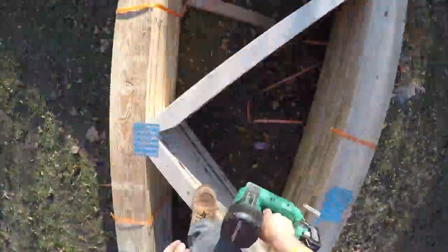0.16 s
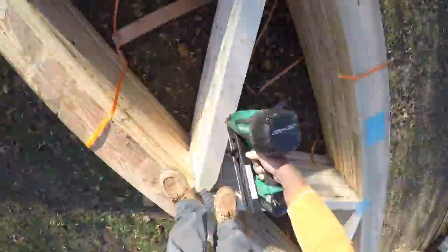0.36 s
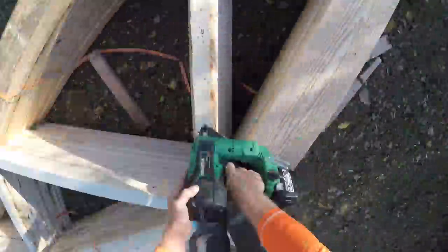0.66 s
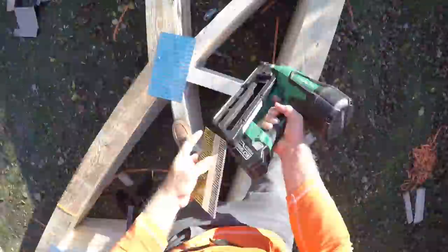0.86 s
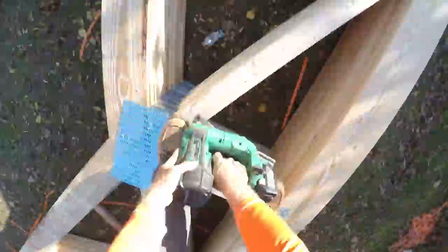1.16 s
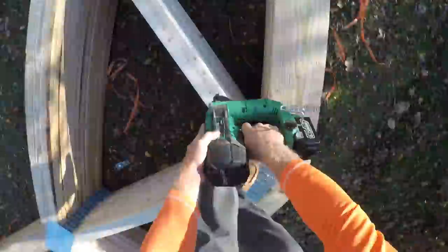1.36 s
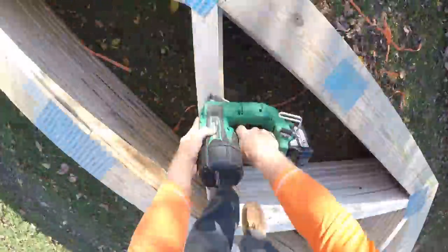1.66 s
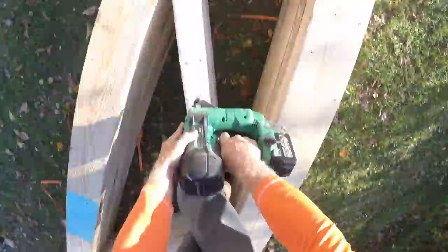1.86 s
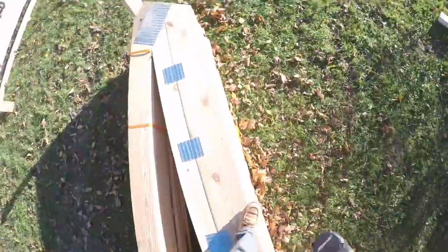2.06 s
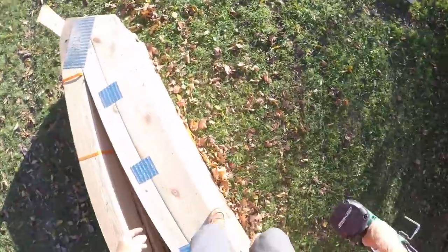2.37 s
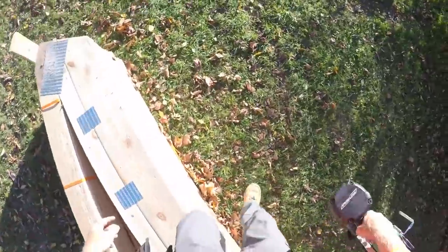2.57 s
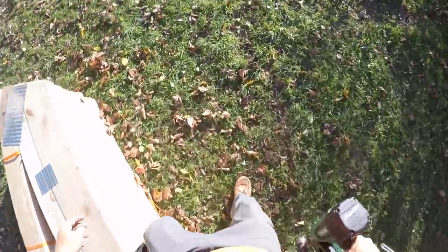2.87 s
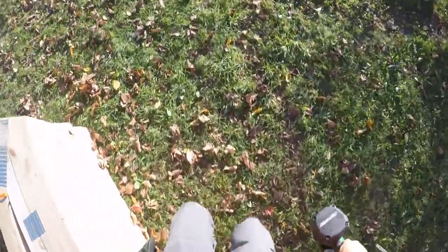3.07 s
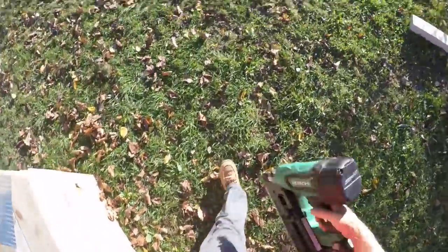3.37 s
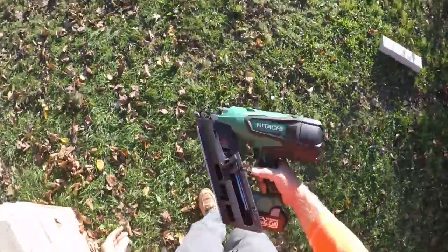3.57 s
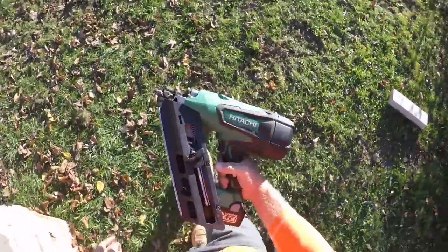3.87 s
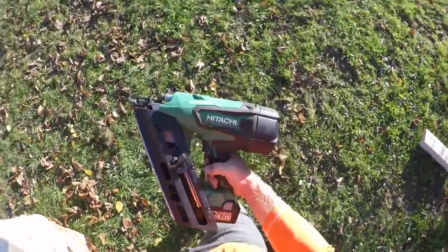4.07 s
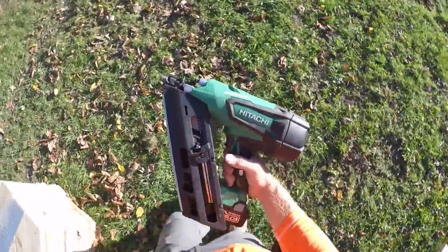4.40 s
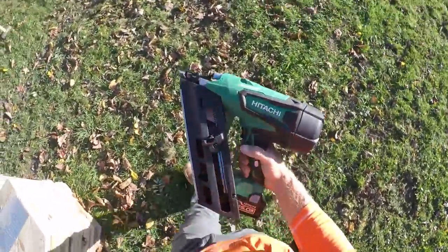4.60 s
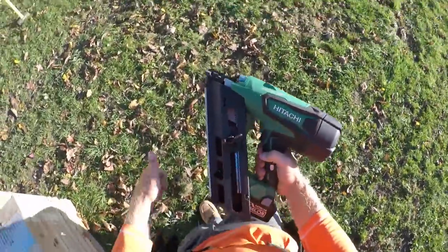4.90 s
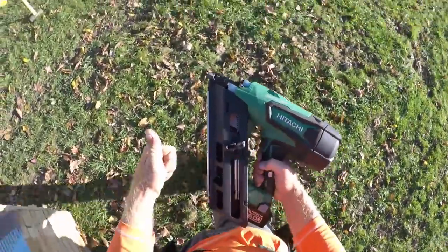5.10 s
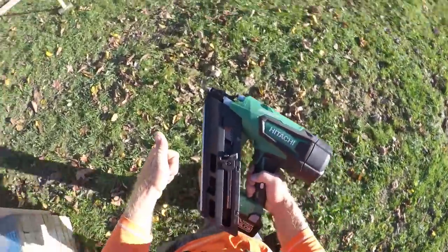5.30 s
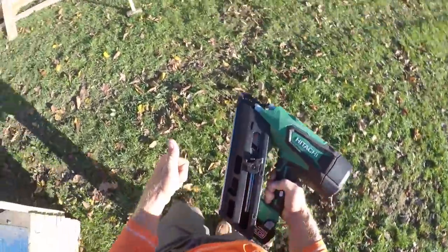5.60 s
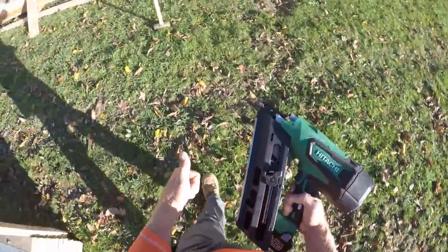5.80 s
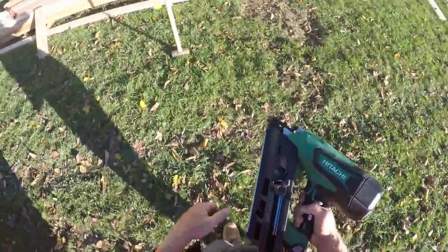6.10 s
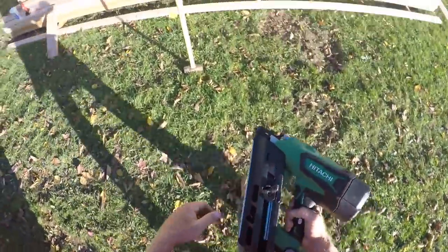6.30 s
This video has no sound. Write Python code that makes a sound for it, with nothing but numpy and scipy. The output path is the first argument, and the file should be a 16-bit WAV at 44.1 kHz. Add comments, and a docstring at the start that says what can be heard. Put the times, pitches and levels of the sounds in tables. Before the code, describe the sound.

Rapid sped-up nail gun snaps and whirrs over a thin whistling rush, then abruptly low wind rumble, leafy footsteps, knocks and a droning distant engine.

```python
"""Nailing roof trusses on a lawn, heard from a body camera. For two seconds the work races by in time-lapse:
outdoor noise is pitched up to a noise rush and an engine whistle made of rough sine lines, and each shot of
the cordless nailer is a noise whirr, a snap and a ring of decaying modes. Then, at normal speed, low noise
rumbles as wind on the microphone, clothes rub close by, a far engine drones as a wavering sine, boots knock
on lumber and tread dry leaves in bursts of noise, and a deep hum comes and goes."""
import sys
import numpy as np
from scipy import signal
from scipy.fft import rfft, irfft, next_fast_len
from scipy.io import wavfile
from scipy.ndimage import uniform_filter1d, map_coordinates

SR = 44100
rng = np.random.default_rng(int(sys.argv[2]) if len(sys.argv) > 2 else 0)


def dump(signal):
    """Clip the signal to [-1, 1] and save it as 16-bit WAV at the path in sys.argv[1]."""
    limited = np.clip(np.atleast_2d(signal).T, -1, 1)
    pcm = np.round(limited * 32767).astype(np.int16)
    wavfile.write(sys.argv[1], SR, pcm)


N = 284445

CUT_S = 2.08  # the time-lapse ends
# nail shots: (time [s], relative wind-up level [dB], ring level [dB], ring centre [Hz])
SHOTS = [(0.0877, -17.5, -36, 2300), (0.1434, -25.5, -31, 2090), (0.174, -28.5, -34, 2410),
         (0.203, -26.5, -41, 2460), (0.2715, -21.5, -33, 2630), (0.3245, -22, -29, 2350),
         (0.358, -23, -31.5, 2310), (0.3939, -24.5, -39, 2630), (0.449, -22.5, -32, 2610),
         (0.5549, -17, -38, 2860), (0.6216, -18.5, -31, 2630), (0.6592, -28.5, -38, 2620),
         (0.6867, -33, -34, 2810), (0.748, -21.5, -31.5, 3160), (1.134, -16, -34.5, 2820),
         (1.159, -32.5, -34, 2880), (1.1932, -33.5, -38.5, 2730), (1.246, -25.5, -33.5, 2290),
         (1.2796, -27.5, -28.5, 2290), (1.3171, -26.5, -32, 2290), (1.3521, -26.5, -32, 2510),
         (1.382, -31, -34, 2830), (1.4209, -30, -34, 2620), (1.469, -26.5, -34.5, 2780),
         (1.5129, -22, -31, 3000), (1.5564, -25.5, -29, 2680), (1.601, -24, -35.5, 2570),
         (1.64, -25, -34.5, 2800), (1.677, -26, -34.5, 2790), (1.7175, -30.5, -33, 2560),
         (1.763, -25, -38.5, 2340), (1.8093, -26.5, -36, 3080), (1.8499, -26.5, -37, 2820),
         (1.89, -25, -40, 2630), (1.9345, -25, -36.5, 2800), (1.9669, -31, -31.5, 3010),
         (2.0019, -28.5, -43.5, 3130), (2.03, -26.5, -35.5, 3010)]
# colour of the pitched-up outdoor noise and of the scrape: (frequency [Hz], density [dB])
RUSH_COLOUR = [(50, -51), (190, -11.5), (480, -8), (780, -3.5), (2010, -6.5), (4500, -17.5), (6500, -26),
               (15000, -32.5)]
# left over right, for the time-lapse and for the yard: (frequency [Hz], level difference [dB])
TOOL_PAN = [(100, -6), (1500, -2.5), (3500, -4), (8000, -11.5)]
YARD_PAN = [(120, -3), (400, -13.5), (700, -8), (1300, -5), (5000, 1.5), (15000, -8)]
# how alike left and right are, before panning: (frequency [Hz], correlation [-1 to 1])
TOOL_ALIKE = [(200, 0.13), (1400, 0.97), (3500, 0.96), (7000, 0.53), (14000, 0)]
YARD_ALIKE = [(40, 0.83), (130, 1), (290, 1), (640, -0.73), (1400, -0.61), (3000, 0.84), (7000, 0.14),
              (15000, 0.39)]


def amp(db):
    """Decibels to gain."""
    return 10 ** (np.asarray(db) / 20)


def unit(x):
    """Scale to rms 1."""
    return x / np.sqrt(np.mean(x ** 2) + 1e-20)


def along(points, hz):
    """(Hz, value) points read on a log axis."""
    f, v = np.transpose(points)
    return np.interp(np.log(hz + 1), np.log(f + 1), v)


def curves(rows):
    """One value per sample for each column after the time."""
    s, *cols = np.transpose(rows)
    return [np.interp(np.arange(N) / SR, s, c) for c in cols]


def during(start, end):
    """1 between two times, with soft edges."""
    t = np.arange(N) / SR
    return uniform_filter1d(((t >= start) & (t < end)) * 1.0, size=128)


def wobble(rate):
    """A smooth random curve, rate knots a second."""
    knots = rng.standard_normal(int(N * rate / SR) + 4)
    at = np.arange(0, len(knots) - 1, 1 / 8)
    return np.interp(np.arange(N) * rate / SR, at, map_coordinates(knots, [at]))


def filtered(x, response):
    """x times a response of frequency."""
    m = next_fast_len(N + 4096, real=True)
    return irfft(rfft(x, m) * response(np.fft.rfftfreq(m, 1 / SR)), m)[..., :N]


def add(track, s, sound):
    """Mix a sound into a track at a time."""
    i = max(round(s * SR), 0)
    track[i:i + len(sound)] += sound[:N - i]


def placed(pair, pan):
    """Lean each frequency to its side."""
    return filtered(pair, lambda hz: amp(np.outer([.5, -.5], along(pan, hz))))


def noise(spectrum, alike, pan, grain_db=0):
    """Stereo noise whose middle has rms 1; grain_db breaks it into crackle."""
    white = rng.standard_normal((2, N)) * amp(grain_db * wobble(900))
    m = next_fast_len(N, real=True)
    hz = np.fft.rfftfreq(m, 1 / SR)
    mid, side = rfft(white, m) * amp(along(spectrum, hz))
    # the less alike the two sides are, the more of the second noise they get
    half_angle = np.arccos(np.clip(along(alike, hz), -1, 1)) / 2
    side = side * np.tan(np.minimum(half_angle, np.pi / 2.5))
    lean = amp(np.outer([.5, -.5], along(pan, hz)))
    pair = irfft(np.array([mid + side, mid - side]) * lean, m)[:, :N]
    return pair / pair.mean(0).std()


def tone(rows, waver, flutter_db=1, orders=((1, 0),), order=1, rough=0, width_hz=100):
    """Unsteady lines; rows follow the line of the given order; rough is the share smeared into narrow noise."""
    hz, db = curves(rows)
    phase = 2 * np.pi * np.cumsum(hz / order * (1 + waver * wobble(30))) / SR
    rough = np.clip(rough, 0, 1)
    lines = 0
    for k, level in orders:
        line = np.sqrt(2 - 2 * rough) * np.sin(k * phase)
        if rough:
            smear = wobble(width_hz) * np.sin(k * phase) + wobble(width_hz) * np.cos(k * phase)
            line = line + np.sqrt(rough) * smear
        lines = lines + line * amp(db + level + flutter_db * wobble(20))
    return lines * during(rows[0][0], rows[-1][0])


def swells(rows, rise, fall, bed_db):
    """Gain of (s, hold s, dB) events over a bed; each rises and falls 20 dB in the given times."""
    t = np.arange(N) / SR
    power = amp(bed_db) ** 2
    for s, hold, db in rows:
        away = np.maximum(s - t, 0) / rise + np.maximum(t - s - hold, 0) / fall
        power = power + amp(db - 20 * np.minimum(away, 10)) ** 2
    return np.sqrt(power)


def blip(s, hz, db, cycles):
    """A soft-edged ring of a few cycles, centred on a time."""
    turns = (np.arange(N) / SR - s) * hz
    return amp(db) * np.exp(-np.minimum((turns / cycles) ** 2, 50)) * np.sin(2 * np.pi * turns)


def resonant(x, hz, q):
    """x through one broad resonance."""
    return signal.lfilter(*signal.iirpeak(hz, q, fs=SR), x)


def racing_yard(rush_db=-4.0, rustle_db=-2, steady_db=-15):
    """In time-lapse wind is a coarse rush with steady tones, steps crackle and the engine whistles roughly."""
    # surges of sped-up outdoor noise: (time [s], hold [s], relative level [dB])
    surges = [(.06, 0.026, -27.5), (.522, 0.03, -24.5), (.83, 0.048, -24.5), (.875, 0.092, -22.5),
              (1.003, .009, -22), (1.06, 0.069, -30.5)]
    # sped-up steps in leaves: (time [s], hold [s], relative level [dB])
    crackles = [(.825, 0.1, -36), (.95, 0.012, -24), (.99, 0.019, -20.5), (1.06, 0.012, -25),
                (1.11, 0.019, -29)]
    # colour of the crackle: (frequency [Hz], density [dB])
    rustle_colour = [(2000, -28), (5000, -5), (8000, 0), (12000, 0), (15500, -10)]
    # strongest line of the sped-up engine, its eighth order: (time [s], pitch [Hz], level [dB])
    whistle_glide = [(.48, 1960, -56), (.535, 2100, -39), (.58, 2230, -40.5), (.63, 2243, -39),
                     (.70, 2300, -51.5), (.775, 2236, -35), (.805, 2234, -29), (.87, 2190, -25),
                     (.91, 2127, -24), (.96, 2200, -29.5), (1.0, 2250, -43.5), (1.07, 2370, -39.5),
                     (1.125, 2400, -35), (1.22, 2240, -59), (1.25, 2268, -45), (1.44, 2215, -68)]
    # the whistle's lines: (order [multiple of the base pitch], relative level [dB])
    whistle_orders = [(5.1, -13), (6, -15), (8, 0), (11, -14), (13.05, -13)]
    # steady tones within the rush: (frequency [Hz], relative level [dB])
    steady_tones = [(790, -5), (921, -2), (1414, 3), (1577, 3)]
    # dull bumps: (time [s], frequency [Hz], envelope peak [dB])
    dull_bumps = [(0.874, 199, -27.5), (1.007, 742, -12), (1.009, 1240, -12), (1.012, 463, -24.5)]
    t = np.arange(N) / SR
    # the bed sinks by 2.5 dB a second; rise and fall are for 20 dB
    rush = swells(surges, rise=0.078, fall=0.032, bed_db=-41 - 2.5 * t)
    rustle = swells(crackles, rise=0.0098, fall=0.017, bed_db=-61)
    air = rush * amp(rush_db + 2.4 * wobble(200)) * noise(RUSH_COLOUR, TOOL_ALIKE, TOOL_PAN, grain_db=3.5)
    crackle = rustle * amp(rustle_db) * noise(rustle_colour, TOOL_ALIKE, TOOL_PAN, grain_db=4.5)
    whistle = tone(whistle_glide, waver=0.002, flutter_db=1.5, orders=whistle_orders, order=8,
                   rough=.3, width_hz=150)
    tones = sum(amp(db) * np.sin(2 * np.pi * hz * t + wobble(25)) for hz, db in steady_tones)
    steady = rush * amp(steady_db) * tones
    bumps = sum(blip(s, hz, db, cycles=0.86) for s, hz, db in dull_bumps)
    return (air + crackle + placed(whistle + steady + bumps, TOOL_PAN)) * during(0, CUT_S)


def shoving(lead_s=0.037, below_db=-18):
    """The nose scrapes as it is shoved onto the wood: swelling noise, louder ahead of a louder wind-up."""
    gain = np.zeros(N)
    t = np.arange(int(lead_s * SR)) / SR
    for s, motor_db, _, _ in SHOTS:
        add(gain, s - lead_s, amp(motor_db + below_db - 20 * (1 - t / lead_s)))
    return gain * noise(RUSH_COLOUR, TOOL_ALIKE, TOOL_PAN)


def snapping(t):
    """The driver strikes the nail: short decaying resonances, scaled to peak 1."""
    # the snap's resonances: (frequency [Hz], relative level [dB], time to fall 60 dB [s])
    resonances = [(1610, -11, 0.018), (3130, 4, 0.0074), (3960, 0, 0.0051), (9700, 15.5, 0.0018),
                  (13240, 1, 0.0034)]
    snap = 0
    for hz, level, t60 in resonances:
        decay = amp(level + rng.normal(0, 3.5) - 60 * t / t60)
        snap = snap + decay * np.sin(2 * np.pi * hz * rng.normal(1, 0.04) * t)
    return snap / np.abs(snap).max()


def ringing(t, centre_hz, bloom=0.0031, focus_db=7, t60=0.037):
    """Tool and wood bloom after the snap; each spot favours modes near its centre, loose parts blur them."""
    # modes of nailer and lumber: (frequency [Hz], relative level [dB])
    mode_rows = [(1423, -3.5), (1792, -4), (2220, -0.5), (2613, 0.5), (2960, 1.5), (3200, -4), (3637, 1.5),
                 (4170, -1.5)]
    hz, db = np.transpose(mode_rows)[:, :, None]
    chance = rng.standard_normal((3, len(mode_rows), 1))
    db = db + 3 * chance[0] - focus_db * np.minimum(np.abs(np.log2(hz / centre_hz)), 1)
    # a random walk of the phase widens each mode
    steps = rng.standard_normal((len(mode_rows), len(t)))
    blur = np.cumsum(steps, axis=1) * np.sqrt(90 / (2 * np.pi * SR))
    phase = 2 * np.pi * (hz * (1 + 0.0337 * chance[1]) * t + chance[2] + blur)
    modes = amp(db - 60 * t / t60) * np.sin(phase)
    ring = modes.sum(0) * (1 - np.exp(-(t / bloom) ** 2))
    ring = signal.sosfilt(signal.butter(2, [400, 5000], "bandpass", fs=SR, output="sos"), ring)
    return ring / ring[(t > .002) & (t < .0115)].std()


def nailer(windup_s=0.0044, hiss_s=0.016, snap_db=-8.0, whirr_db=1, hiss_db=-45, press_db=-37):
    """The nose presses down, the motor winds up, the driver snaps, tool and wood ring, a short hiss follows."""
    # small clacks of handling between the shots: (time [s], relative level [dB])
    clacks = [(0.0575, -24), (0.119, -27.5), (0.8225, -18), (0.908, -19), (1.498, -31.5), (1.5854, -28.5),
              (1.708, -31), (1.881, -28.5)]
    # colours of the whirr and of the hiss: (frequency [Hz], density [dB])
    whirr_colour = [(150, -10), (1200, -3.5), (2000, 3.5), (3800, -1.5), (5500, -9), (10000, -9.5),
                    (15000, -17)]
    hiss_colour = [(1500, 3), (3000, 4.5), (6900, 2), (9700, 3.5), (11000, 2.5), (14500, -2.5)]
    body, whirr, hiss = np.zeros((3, N))  # body is sound; whirr and hiss are gains for noise
    t = np.arange(SR // 16) / SR
    for s, motor_db, ring_db, centre_hz in SHOTS:
        press = amp(press_db + rng.normal(0, 2) - 60 * t / 0.0082)
        add(whirr, s - rng.uniform(0.0091, 0.016), press)
        spin_up = (t < windup_s) * (1 - np.exp(-t / 0.00043))
        add(whirr, s - windup_s, amp(motor_db + whirr_db) * spin_up)
        add(body, s - .00015, amp(snap_db) * snapping(t))
        add(whirr, s, amp(-24.5 - 60 * t / 0.0091))  # burst of noise with the snap
        add(body, s, amp(ring_db) * ringing(t, centre_hz))
        add(hiss, s, amp(hiss_db + rng.normal(0, 1.6)) * (t < hiss_s))
    for s, db in clacks:
        add(whirr, s - .0005, amp(db + 4.5 - 60 * t / 0.014))
    grit = whirr * noise(whirr_colour, TOOL_ALIKE, TOOL_PAN, grain_db=3)
    return placed(body, TOOL_PAN) + grit + hiss * noise(hiss_colour, TOOL_ALIKE, TOOL_PAN)


def wind():
    """Gusts buffet the microphone as low noise over the wash of open air."""
    # gusts on the microphone: (time [s], hold [s], level [dB])
    gusts = [(2.69, 0.27, -14), (3.35, 0.9, -22.5), (4.68, 1.75, -20.5), (5.14, 0.26, -16.5)]
    # open air: (time [s], level [dB])
    breeze = [(2.08, -52.5), (2.6, -49.5), (2.9, -41.5), (4.1, -40), (4.7, -36), (5.9, -37), (6.45, -35)]
    # colours of the buffeting and of the air: (frequency [Hz], density [dB])
    buffet_colour = [(8.8, -20), (15, 0.5), (79, 1), (141, -11), (201, -18), (480, -40.5), (880, -120)]
    air_colour = [(150, -16), (250, -1.5), (590, -4), (1100, -19), (2100, -24), (2650, -28), (3700, -27.5),
                  (4950, -31.5), (6560, -28), (10300, -38), (14000, -53)]
    # the wind between gusts builds up over 0.61 s after the time-lapse
    lull_db = np.interp(np.arange(N) / SR, [CUT_S, CUT_S + 0.61], [-36.5, -24])
    strength = swells(gusts, rise=0.17, fall=0.36, bed_db=lull_db)
    buffet = strength * amp(0.96 * wobble(16)) * noise(buffet_colour, YARD_ALIKE, YARD_PAN)
    air = amp(curves(breeze)[0] + 0.77 * wobble(14)) * noise(air_colour, YARD_ALIKE, YARD_PAN)
    return (buffet + air) * during(CUT_S, 7)


def rubbing(rub_db=-1, hollow_db=-3):
    """Clothes and harness stroke near the camera: swelling noise, with a gliding hollow tone in long strokes."""
    # strokes: (time [s], hold [s], relative level [dB])
    strokes = [(2.88, 0.11, -29), (2.975, 0.033, -24.5), (3.07, 0.17, -31.5), (5.07, 0.35, -41.5),
               (5.5, 0.86, -42)]
    # colour of the rubbing: (frequency [Hz], density [dB])
    scuff_colour = [(120, -17), (250, 7), (370, -9), (480, 2), (580, -5), (750, -17.5), (1100, -26.5),
                    (2100, -18.5), (3200, -38), (8000, -66)]
    # hollow tone, one curve for each long stroke: (time [s], pitch [Hz], relative level [dB])
    hollow_glides = [
        [(2.88, 645.3, -43), (2.99, 470, -20), (3.06, 480, -38), (3.28, 528.6, -28), (3.38, 490, -42.5),
         (3.54, 473, -33)],
        [(5.05, 557.7, -43), (5.225, 475, -29.5), (5.45, 476, -37.5)],
    ]
    strength = swells(strokes, rise=0.03, fall=0.11, bed_db=-50) * during(CUT_S, 7)
    rub = strength * amp(rub_db + 2.26 * wobble(40)) * noise(scuff_colour, YARD_ALIKE, YARD_PAN)
    hollow = sum(tone(rows, waver=.015, rough=.9, width_hz=170) for rows in hollow_glides)
    return rub + amp(hollow_db) * placed(hollow, YARD_PAN)


def far_engine():
    """The far engine drones as one wavering line, holds near one pitch, then eases off."""
    # drone: (time [s], pitch [Hz], level [dB])
    engine_glide = [(2.65, 168.9, -32.5), (3.55, 167.6, -38.5), (4.15, 173.6, -29), (4.47, 170, -40.5),
                    (4.95, 172.5, -27.5), (5.73, 173.7, -29), (5.86, 147.3, -39), (5.98, 119.6, -24),
                    (6.45, 124.2, -37)]
    return placed(tone(engine_glide, waver=0.0087), YARD_PAN)


def crunch(per_s, size_db, life_s):
    """Gain that jumps each time a dry leaf gives way, then decays."""
    breaks = (rng.random(N) < per_s / SR) * rng.exponential(size=N)
    jumps = signal.lfilter([1], [1, -np.exp(-1 / (life_s * SR))], breaks)
    return unit(1 + amp(size_db) * jumps)


def treading(leaves_db=-3, focus_db=-2):
    """Boots press leaves and grass: crunching noise swells, each step with its own resonance."""
    # steps: (time [s], hold [s], relative level [dB], centre [Hz])
    treads = [(2.915, .1, -46.5, 3600), (3.175, 0.095, -45.5, 7100), (3.397, .025, -50, 5260),
              (3.537, 0.14, -53.5, 5500), (3.674, 0.18, -45.5, 3740), (4.443, 0.048, -54, 6200),
              (4.577, 0.079, -45.5, 4660), (5.042, .22, -49, 6530), (5.074, .08, -42, 7600),
              (5.58, 0.043, -44.5, 7500), (5.708, 0.082, -50.5, 5900), (6.165, 0.025, -42, 5400),
              (6.27, 0.03, -41, 6540), (6.345, 0.12, -51, 6000)]
    # colour of the leaves: (frequency [Hz], density [dB])
    leaf_colour = [(600, -1.5), (1500, 3.5), (2600, -3), (3600, 0), (4800, -3), (6600, 1), (8500, -10.5),
                   (10000, -10), (13000, -21.5), (15000, -41)]
    litter = noise(leaf_colour, YARD_ALIKE, YARD_PAN, grain_db=2.5)
    litter = litter * crunch(per_s=150, size_db=-3, life_s=.0025)
    steps = 0
    for s, hold, db, hz in treads:
        # 20 dB up in 61 ms, 20 dB down in 96 ms
        gain = swells([(s, hold, db + leaves_db)], rise=0.061, fall=0.096, bed_db=-np.inf)
        steps = steps + gain * (litter + amp(focus_db) * resonant(litter, hz, q=2.34))
    return steps * during(2.857, 7)


def knocking(knock_db=11, knock_t60=0.07):
    """Boots knock on lumber and ground: decaying bursts of dull noise."""
    # knocks: (time [s], relative level [dB])
    knock_rows = [(2.866, -17.5), (2.891, -25), (3.019, -22), (3.738, -20), (4.567, -21), (4.68, -21.5),
                  (4.827, -22.5), (5.081, -23), (6.255, -15.5)]
    # colour of a knock: (frequency [Hz], density [dB])
    boot_colour = [(600, -1.5), (1000, -15), (2100, -21.5), (3000, -34), (8000, -48.5)]
    blows = np.zeros(N)
    t = np.arange(SR // 4) / SR
    for s, db in knock_rows:
        add(blows, s, amp(db + knock_db - 60 * t / knock_t60))
    dull = filtered(blows * rng.standard_normal(N), lambda hz: amp(along(boot_colour, hz)))
    return placed(dull, YARD_PAN)


def cracking(crack_t60=0.075):
    """Single leaves and twigs crack: decaying noise through two equal resonances."""
    # cracks: (time [s], level ahead of the resonances [dB], centre [Hz])
    crack_rows = [(3.737, -22, 4120), (3.753, -25.5, 3940), (4.552, -33.5, 5170), (4.953, -28.5, 4000),
                  (5.08, -26.5, 5950), (5.124, -37, 4500), (5.622, -40.5, 8900), (6.256, -35.5, 7940)]
    twigs = np.zeros(N)
    t = np.arange(SR // 4) / SR
    for s, db, hz in crack_rows:
        burst = amp(db - 60 * t / crack_t60) * rng.standard_normal(len(t))
        add(twigs, s, resonant(resonant(burst, hz, q=2), hz, q=2))
    return twigs


def walking():
    """Boots knock, leaves swish and crunch, twigs crack; something squeaks once, a short sine blip."""
    squeak = blip(3.866, hz=1920, db=-40, cycles=12)
    return knocking() + treading() + cracking() + squeak


def deep_hum(hum_db=-1):
    """A deep hum swells and sinks: one wavering line whose pitch glides up and back down."""
    # hum: (time [s], pitch [Hz], relative level [dB])
    hum_glide = [(3.35, 55, -32.5), (3.48, 67.9, -10.5), (3.63, 85.6, -22.5), (3.75, 88.7, -14.5),
                 (3.88, 82.7, -13.5), (4.0, 75.3, -26.5), (4.15, 71, -40)]
    return placed(amp(hum_db) * tone(hum_glide, waver=0.023), YARD_PAN)


def scene():
    """The time-lapse, then the walk across the lawn."""
    time_lapse = racing_yard() + shoving() + nailer()
    lawn = wind() + rubbing() + far_engine() + walking() + deep_hum()
    return time_lapse + lawn


def rounded(x, top):
    """Round off the peaks that near the top."""
    return x / (1 + np.abs(x / top) ** 6) ** (1 / 6)


def record(dry):
    """The camera rounds off the highest peaks and keeps nothing above its band limit of 16.2 kHz."""
    return filtered(rounded(dry, top=.8), lambda hz: hz < 16200)


dry = scene()
out = record(dry)
dump(out)
```